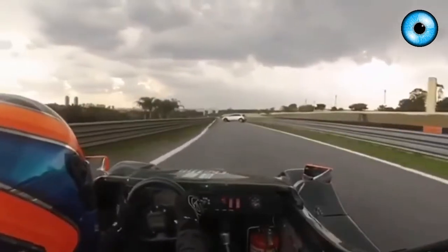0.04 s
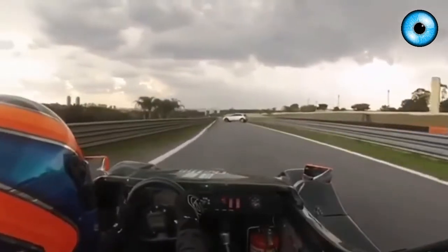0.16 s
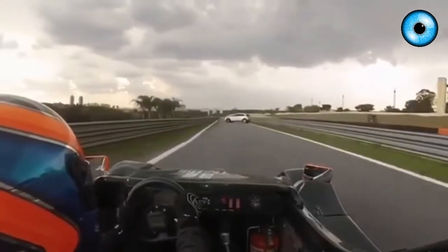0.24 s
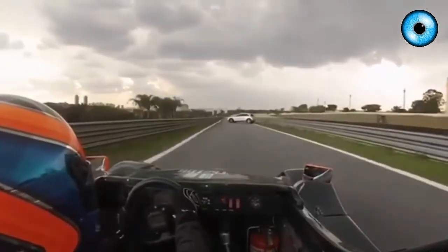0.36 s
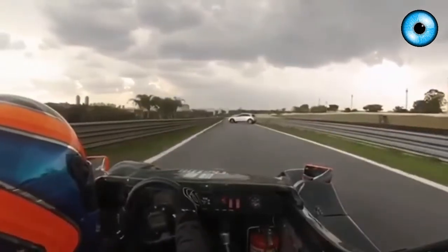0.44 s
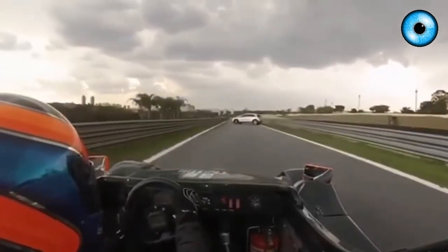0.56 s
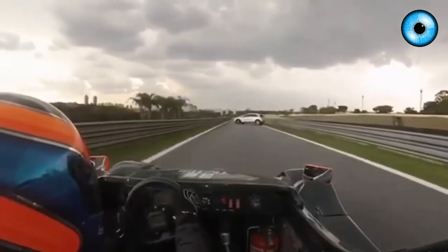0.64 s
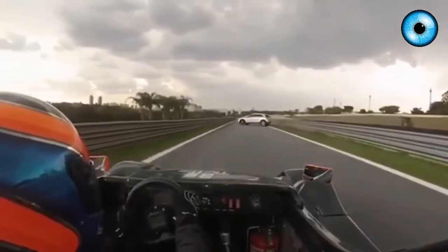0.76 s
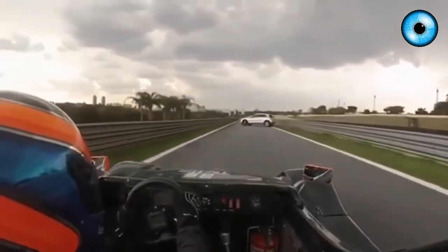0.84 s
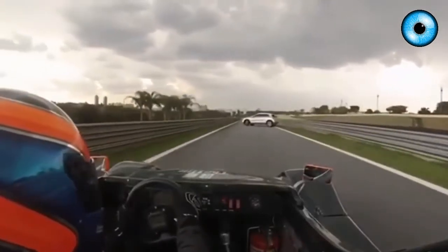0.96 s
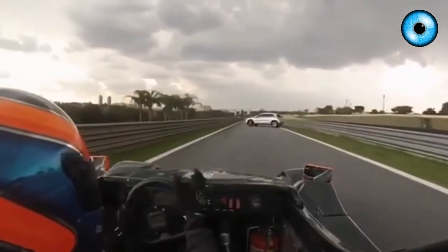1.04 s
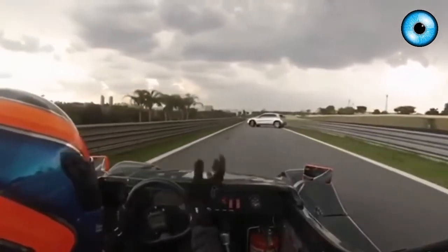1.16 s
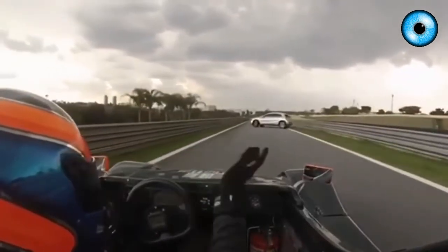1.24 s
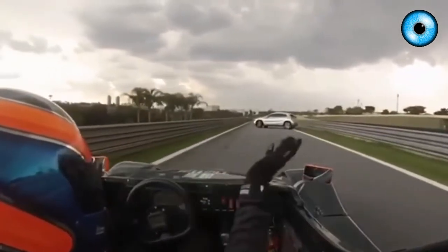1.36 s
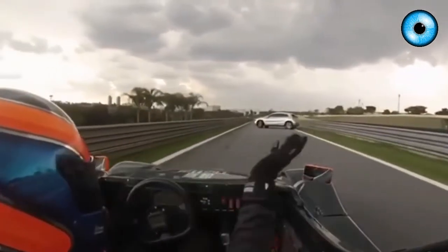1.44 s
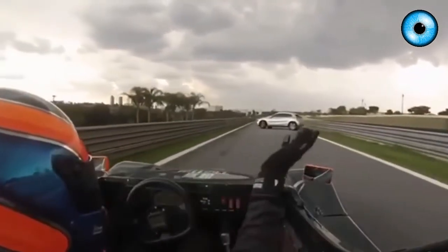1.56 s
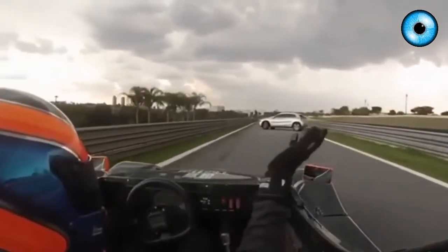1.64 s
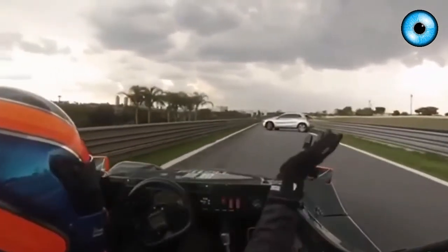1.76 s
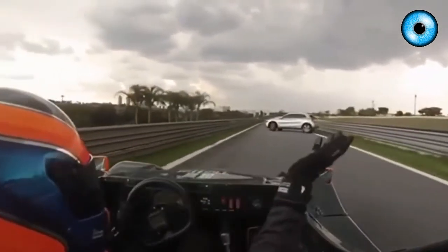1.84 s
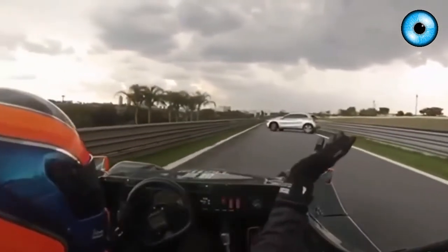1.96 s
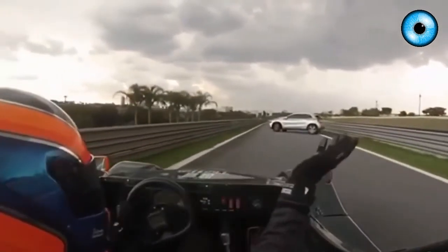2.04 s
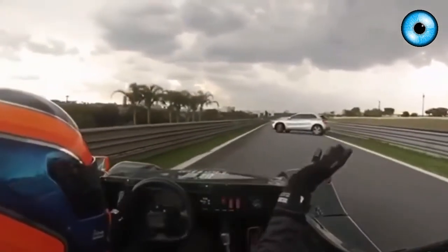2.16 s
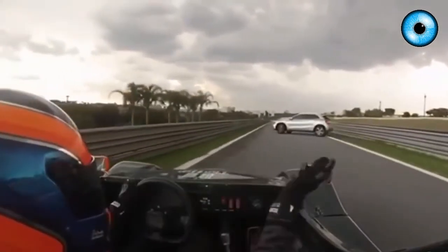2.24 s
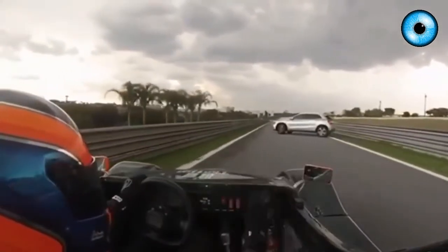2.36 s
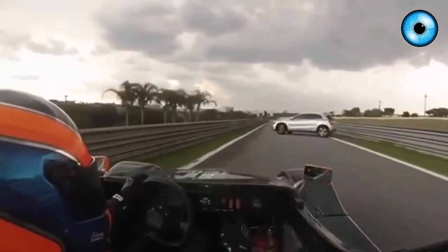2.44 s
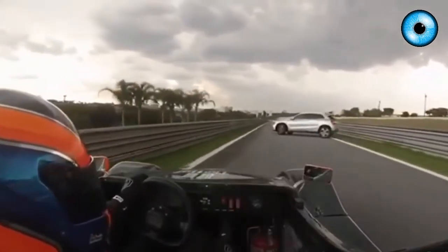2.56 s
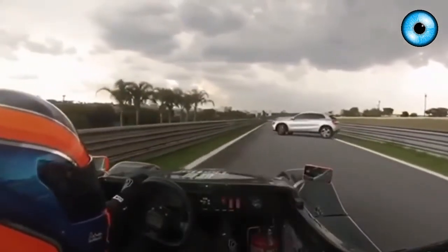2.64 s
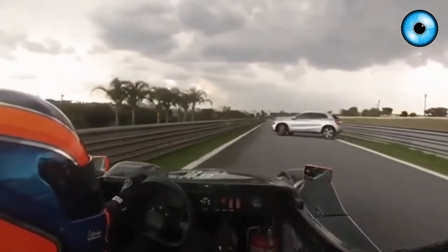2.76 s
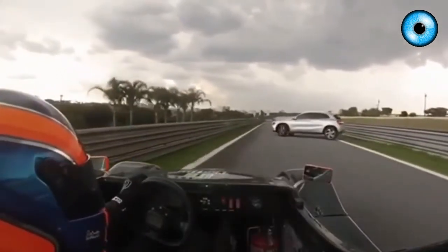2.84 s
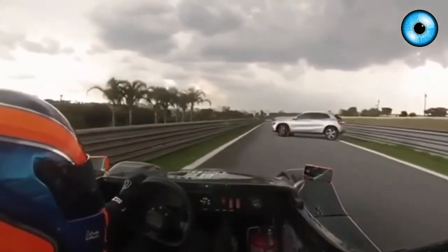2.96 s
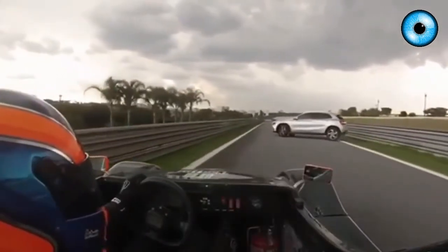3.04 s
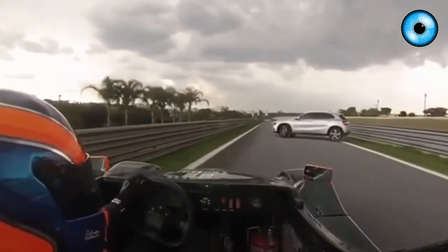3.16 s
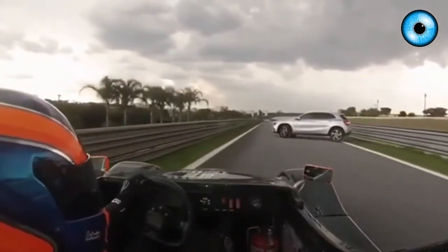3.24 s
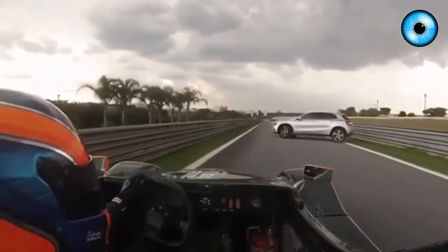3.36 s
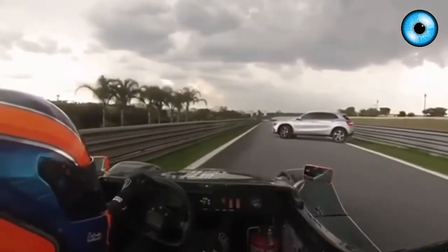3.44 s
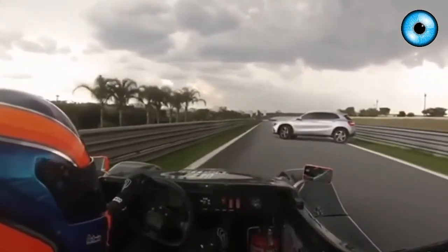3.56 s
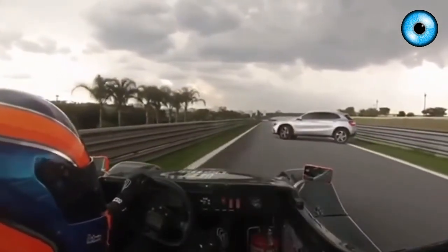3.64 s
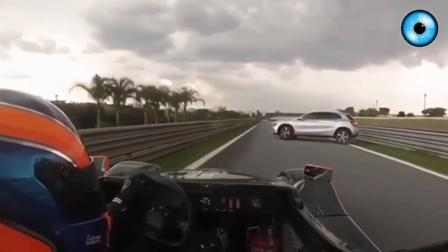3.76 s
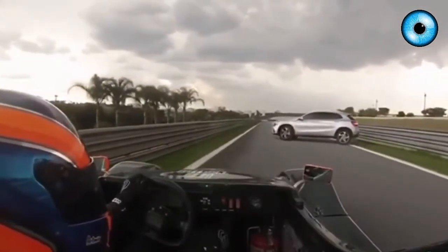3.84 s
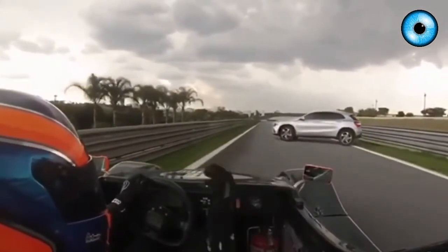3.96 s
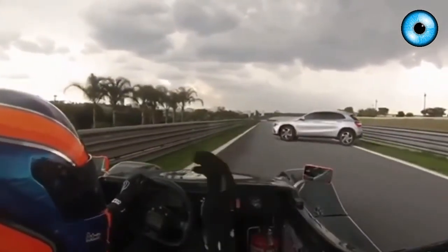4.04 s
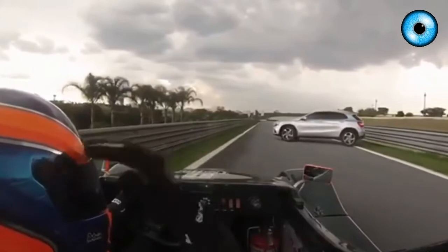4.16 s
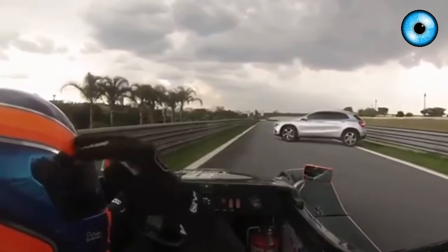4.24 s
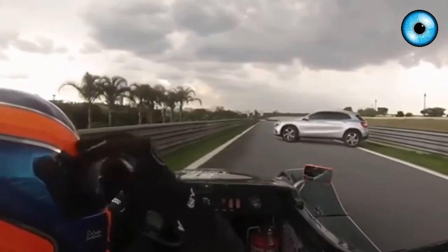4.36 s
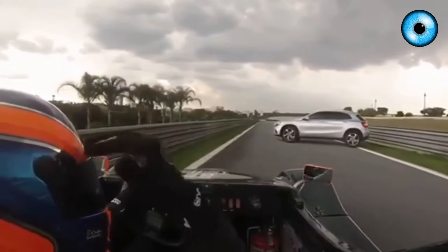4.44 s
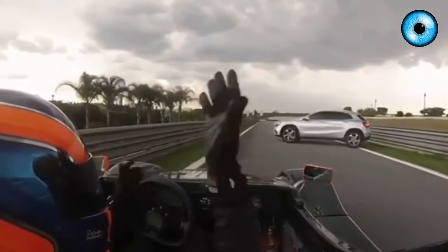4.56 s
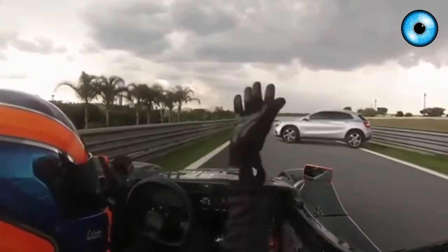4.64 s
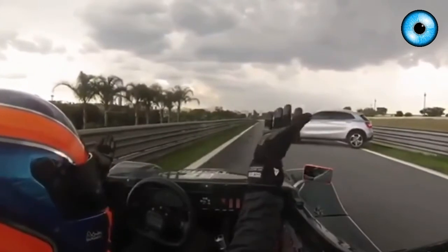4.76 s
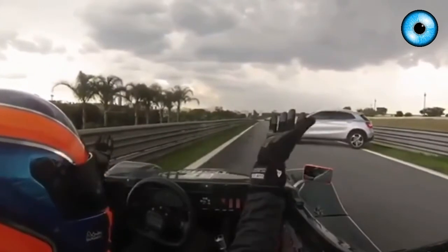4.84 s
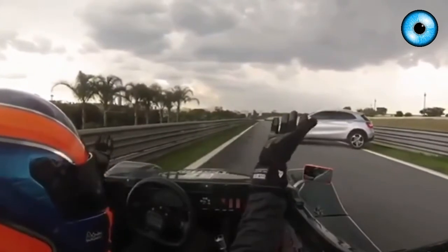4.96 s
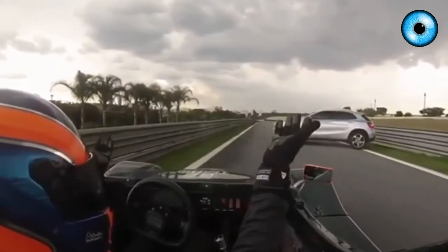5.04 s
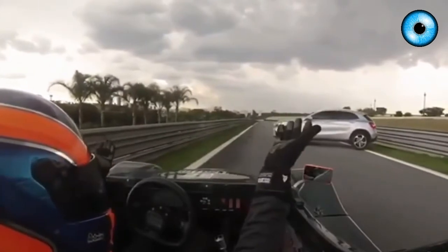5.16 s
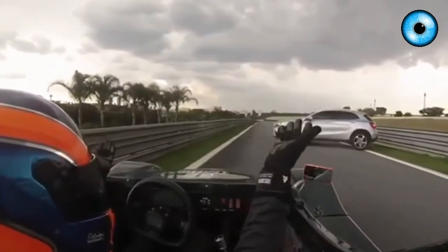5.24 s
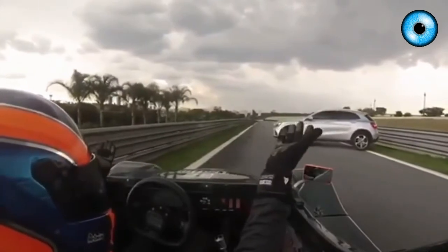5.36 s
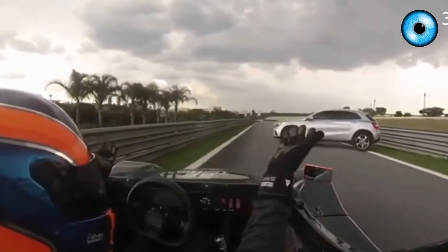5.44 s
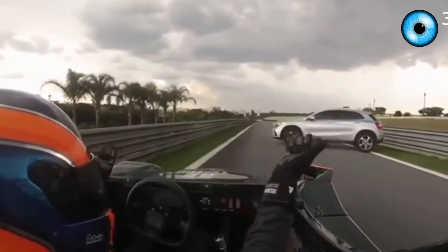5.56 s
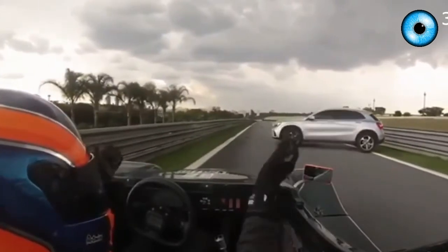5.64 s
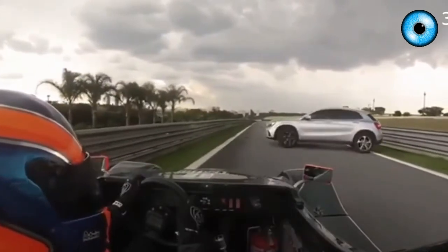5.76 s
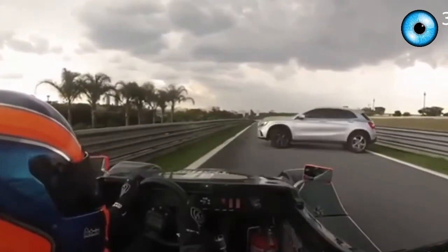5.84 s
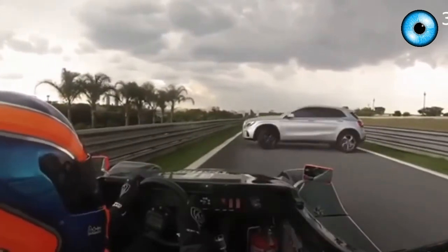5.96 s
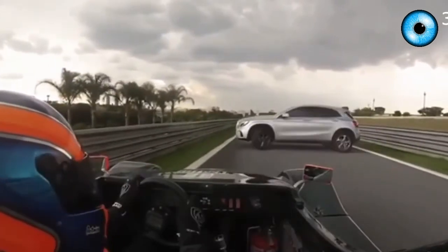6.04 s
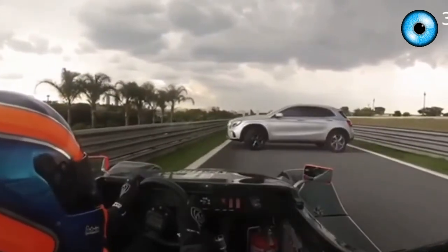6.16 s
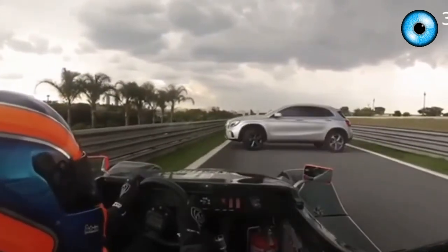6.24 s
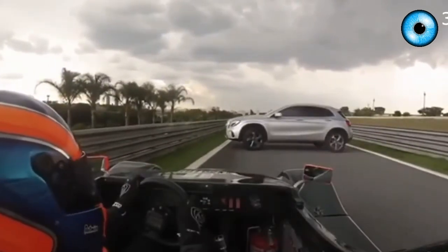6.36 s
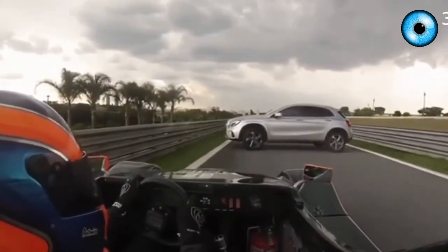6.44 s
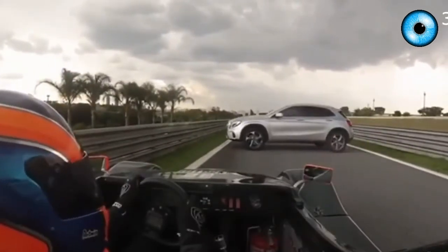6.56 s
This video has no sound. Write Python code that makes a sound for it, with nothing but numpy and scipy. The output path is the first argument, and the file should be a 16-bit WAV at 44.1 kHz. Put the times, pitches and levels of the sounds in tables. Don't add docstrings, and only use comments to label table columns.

```python
import sys
import numpy as np
from scipy import signal
from scipy.io import wavfile
from scipy.ndimage import uniform_filter1d

SR = 44100
rng = np.random.default_rng(int(sys.argv[2]) if len(sys.argv) > 2 else 0)


def bounce(signal):
    frames = np.transpose(np.atleast_2d(signal))
    limited = np.clip(frames, -1, 1)
    pcm = np.round(limited * 32767).astype(np.int16)
    wavfile.write(sys.argv[1], SR, pcm)


def level_to_linear(level):
    exponent = np.asarray(level, float) / 20
    return 10 ** exponent


N = 290619
TIME = np.arange(N) / SR

MOUNT_HZ, MOUNT_WIDTH_HZ = 51.5, 7.7
STOP_S, DECLUTCH_S = 3.8, .962

# [t/s, f/Hz]
FIRING_RATE = [(0.0, 90.5), (0.2, 86.7), (0.9, 62.1), (1.25, 44.8), (1.55, 31.0), (1.75, 33.6),
               (2.15, 37.8), (2.95, 37.8), (3.55, 36.5), (3.75, 34.3), (4.2, 37.3), (4.6, 35.6),
               (5.15, 37.3), (5.45, 36.2), (5.75, 37.0), (6.15, 33.0), (6.59, 33.3)]
# [multiple of the firing rate, level under the tone/dB, unsteadiness/dB]
OVERTONES = [(2, -13.5, 5), (4, -26, 5.5), (6, -15.5, 4.5), (8, -27, -0.5)]
# [f/Hz, width/Hz, level/dB]
TONE_LIFTS = [(48.35, 10.5, 21.5), (57.2, 4.8, 8.5), (40.9, 1.8, -11.5), (37.7, 7.2, 3.5)]
CYLINDERS_DB = [-0.3, -1.0, 1, 0.75]
# [place in the turn 0-1, length/turns, level/dB]
VALVE_CLACKS = [
    (0.63, 0.086, -8),
    (0.23, 0.088, -12),
]
# [t/s, length/s, clatter level/dB, panel level/dB, drone level/dB]
STUMBLES = [
    (1.3, 0.23, -5.5, -3, 1.5),
    (2.82, .05, -1, -8, 1.5),
    (3.037, 0.077, 3.5, -0.5, 1.5),
    (3.222, .07, 1, 2.5, -1),
    (3.603, 0.065, 3.5, 2.5, 8),
    (4.01, .04, 1, 5, -1),
    (4.47, 0.018, -2, 5, -2.5),
    (4.674, .1, 1, 2.5, -1),
    (5.717, .15, 0, -3.5, 1),
    (6.483, .03, -1, -2, 2),
]
# [t/s, length/s, level/dB]
BOOMS = [
    (.22, 0.23, 3.5),
    (0.385, 0.034, 5.5),
    (.83, 0.062, 6.5),
]
# [t/s, blow level/dB, low thud level/dB, bright tick level/dB]
BRACKET_KNOCKS = [(1.407, -21.5, -17, -20), (1.685, -15.5, -15, -21), (1.75, -20, -16, -17.5),
                  (2.246, -17, -19, -17), (2.771, -25, -13, -13.5), (3.056, -9.5, -0.5, -18),
                  (3.083, -17, 8, -16), (3.093, -19, 0.5, -19), (3.201, -17.5, -29, -20),
                  (3.406, -29, -4, -14), (3.601, -19.5, -3, -10), (3.612, -20, -15, -17),
                  (3.987, -26, -16, -6.5), (4.26, -31, -7, -6.5), (5.523, -21.5, 0.5, -13),
                  (5.579, -20.5, -8, -14), (6.022, -25, -19, -11.5), (6.15, -26, -19, -25),
                  (6.179, -25, -17, -37), (6.232, -19, -10, -29), (6.566, -23, 2.5, -15)]
CLIP_KNOCKS = [
    (1.835, -27, -9, -22),
    (2.988, -27, -18, -18),
    (3.069, -18, 3.5, -20),
    (3.192, -19.5, -22, -13),
    (3.341, -19, -18, -34.5),
    (3.402, -33.5, -13, -3.5),
    (3.558, -17, -13, -32),
]
# [t/s, level/dB]
SNAPS = [
    (3.064, -24),
    (3.611, -15.5),
]
# [t/s, length/s, level/dB]
BUMPS = [
    (.55, 0.37, 7.5),
    (1.559, 0.15, 9.5),
    (2.45, 0.11, 4),
    (3.252, .2, 6),
    (4.45, 0.2, 3.5),
    (5.2, .1, 4.5),
    (6.246, 0.38, 7.5),
]
# [f/Hz, idle level/dB, rolling level/dB]
CASE_COLOUR = [(90, -54, -54), (154, -64.5, -51), (261, -54.5, -44.5), (408, -60.5, -53.5), (625, -54, -47),
               (1140, -57.5, -48.5), (1597, -62.5, -44), (2246, -66, -50), (2943, -75.5, -60.5),
               (4560, -80.5, -64.5), (7060, -95, -76.5), (10600, -104, -89), (12700, -121, -102),
               (15500, -136, -112)]
# [f/Hz, width/Hz, idle level/dB, rolling level/dB]
CASE_MODES = [(220, 38, 4.5, 5), (297.7, 81, 14, 13), (374.7, 34, 8.5, 13.5), (507, 137.5, -23, -18),
              (704, 27, -16, -12), (1059.7, 68.5, 15, 14.5), (1148, 70, 6.5, 3), (1304, 60, 3.5, -8.5),
              (1385, 27, 2.5, 10), (1637, 50, 3.5, 9.5), (1737.5, 253, 16, 12), (2012, 193, -14, -14.5),
              (2311, 95, 6.5, 12), (2520, 185, 5.5, 11.5), (2640, 57, -19.5, 9.5), (2822, 167, 14, 10.5),
              (3194, 94, 11.5, 8.5), (3597, 310, 5.5, 7.5), (4119, 38, 12.5, 16), (4250, 200, -15.5, -7.5),
              (4710, 120, 5, 7), (5226, 106, 12.5, 9.5), (5650, 230, -5.5, -2), (6340, 110, 16.5, 10.5),
              (7850, 66, 3, 10), (8800, 220, 1, 3.5), (10780, 310, 11.5, 14.5)]
# [t/s, length/s, lower edge f/Hz, level/dB]
TREBLE_GAPS = [(.04, .08, 8300, -11), (.212, .014, 10200, -20), (1.94, .046, 3500, -23),
               (2.026, .014, 3600, -9), (2.222, .016, 3300, -10), (3.76, .014, 4000, -9),
               (4.41, .022, 3300, -10), (4.5, .014, 3600, -9), (5.565, .006, 3000, -7),
               (6.04, .018, 4000, -11), (6.42, .02, 4100, -11)]
# [f/Hz, share 0-1, level/dB]
PATCH_LOSS = [(7800, 0, -14), (8500, .35, -14), (10800, .45, -13), (11900, .5, -30), (13500, .5, -34),
              (14700, .3, -34), (15000, .7, -34)]


def firing(hz, turns, tone_db):
    idle = np.clip((46 - hz) / 6, 0, 1)
    throb_db = idle * (2.6 * np.cos(np.pi * turns / 2) + 1.7 * wander(20)) + .6 * wander(5.8)
    sing = level_to_linear(-24) * np.exp(-((hz - MOUNT_HZ) / MOUNT_WIDTH_HZ) ** 2) * np.cos(8 * np.pi * turns)
    upper = 0
    for multiple, db, sway_db in OVERTONES:
        upper = upper + level_to_linear(db + sway_db * wander(9)) * np.cos(2 * np.pi * multiple * turns)
    tone = level_to_linear(throb_db) * np.cos(2 * np.pi * turns)
    return np.sqrt(2) * level_to_linear(tone_db) * (tone - idle * upper + sing)


def idling(turns):
    level_db = by_speed(-40, rise_db=2.9, power=.88) + peaks(TIME, STUMBLES, column=0)
    panel_db = by_speed(-40.5, rise_db=5, power=2) + peaks(TIME, STUMBLES, column=1) + 1.6 * wander(14)
    drone_db = by_speed(-42, rise_db=19.6, power=1.72) + peaks(TIME, STUMBLES, column=2)
    drone_db = drone_db + 1.2 * wander(14)
    depth = np.clip(.68 + .08 * wander(8), 0, 1)
    cylinders_db = np.resize(CYLINDERS_DB, 1000)
    strength = level_to_linear(1.14 * rng.standard_normal((1000, 2)) + cylinders_db[:, None])
    noise = rng.standard_normal((3, N))

    beat = taps = 0
    for k, (place, length, db) in enumerate(VALVE_CLACKS):
        away = (turns - place + .5) % 1 - .5
        force = strength[(turns - place + 1.5).astype(int), k]
        beat = beat + level_to_linear(db) * force * np.exp(-.5 * (away / length) ** 2)
        tap = np.diff(np.floor(turns - place + length), prepend=0)
        taps = taps + np.sqrt(level_to_linear(db)) * force * tap
    taps = depth * evened(taps) / depth.mean()
    clatter = evened((1 - depth + depth * evened(beat)) * noise[0])

    cylinder_db = np.interp(turns + 1.0, np.arange(1000), cylinders_db)
    swell_db = cylinder_db + 4.1 * depth * np.cos(2 * np.pi * (turns - .85)) + .41 * wander(25)
    swell = level_to_linear(swell_db) * noise[1]
    sizzle_db = 1.18 * wander(28) + 1.5 * np.cos(np.pi * turns)
    sizzle = level_to_linear(sizzle_db) * (noise[2] + .22 * grit(320, 2.7) + .74 * clatter)
    air = level_to_linear(.77 * wander(15)) * rng.standard_normal(N)

    shake = band(evened(swell), 1370, "low")
    shake = shake + band(evened(clatter + .95 * taps), [1400, 2050], "band")
    shake = shake + band(.45 * taps, [900, 1400], "band")
    shake = shake + band(evened(sizzle), [2050, 4300], "band")
    shake = shake + band(air + .49 * sizzle, 4730, "high")
    sound = shell(shake * level_to_linear(.27 * wander(8.3)), column=0)

    drone = level_to_linear(drone_db + 1.5) * evened(band(sound, 470, "low"))
    panel = level_to_linear(panel_db) * evened(band(sound, [500, 1300], "band"))
    gear = level_to_linear(level_db - .16) * evened(band(sound, 1410, "high"))
    return (drone + panel + gear) * np.interp(TIME, [.95, 1.0, 2.0, 3.5], [0, .7, .8, 1])


def rolling(turns):
    free = step(DECLUTCH_S, .011)
    wheel_s, first_s, surge_s, fade_s = .126, .023, .061, 1
    surge_db = 4.5 * np.exp(-TIME / fade_s - (TIME - first_s) % wheel_s / surge_s)
    geared = (1 - free) * level_to_linear(-19 - 6.5 * TIME + uniform_filter1d(surge_db, size=300))
    coasting = free * level_to_linear(-31) * np.clip(1 - TIME / STOP_S, 0, 1)
    hiss_db = -44 - 9.5 * TIME - 7 * np.maximum(TIME - DECLUTCH_S, 0)
    gust_db = 7 * (step(.024, .02) - step(.312, .0073))

    pulse_db = wander(45.34) + .78 * np.cos(2 * np.pi * (turns - .9))
    shake = level_to_linear(pulse_db) * (rng.standard_normal(N) + .36 * grit(1500, .74))
    sound = shell(evened(shake), column=1)

    body = band(sound, 403, "low") * (geared * level_to_linear(peaks(TIME, BOOMS)) + coasting)
    panels = band(sound, [480, 1280], "band") * geared
    panels = panels + band(sound, [480, 930], "band") * coasting * level_to_linear(6.5)
    bite_db = 5.5 * step(DECLUTCH_S - .045, .008)
    gears = band(sound, [1280, 2050], "band") * (geared * level_to_linear(bite_db) + coasting)
    bright = band(sound, [2050, 3920], "band") * (geared * level_to_linear(1.5 - 2.5 * TIME) + coasting)
    hiss = evened(band(sound, 4180, "high")) * level_to_linear(hiss_db + gust_db + 2.5)
    return body + panels + gears + bright + hiss


def knocks():
    bracket_hz, clip_hz, fade_s, rise_s = 2820, 3480, .0078, .0011
    blows = np.zeros((4, N))
    rows = [(*row, bracket_hz) for row in BRACKET_KNOCKS] + [(*row, clip_hz) for row in CLIP_KNOCKS]
    noise, t = rng.standard_normal((len(rows), 2000)), np.arange(2000) / SR
    shape = np.exp(-t / fade_s) * (1 - np.exp(-t / rise_s)) ** 2
    for burst, (s, db, low_db, high_db, hz) in zip(noise, rows):
        ring = np.sin(2 * np.pi * hz * t) * (1 + .77 * evened(uniform_filter1d(burst, 40)))
        part = blows[:, round(s * SR):][:, :len(t)]
        gains = level_to_linear([[db + low_db + .5], [db], [db + high_db + 12.5], [db + high_db]])
        part += (gains * [burst, burst, burst, ring] * shape)[:, :part.shape[1]]

    thud, blow, tick, ringing = blows
    shake = band(thud, 500, "low") + band(blow, [1250, 2100], "band")
    shake = shake + .51 * band(blow, [500, 1250], "band") + band(tick, [2100, 4100], "band")
    snaps = sum(level_to_linear(db) * np.exp(-((TIME - s - fade_s) / fade_s) ** 2) for s, db in SNAPS)
    shake = shake + band(snaps * rng.standard_normal(N), [4000, 8500], "band")
    return level_to_linear(-4.5) * shell(shake, column=0) + band(ringing, 5300, "low")


def mount(hz):
    noise = rng.standard_normal((2, N))
    r, w = np.exp(-np.pi * MOUNT_WIDTH_HZ / SR), 2 * np.pi * MOUNT_HZ / SR
    swing = signal.lfilter([1, 0, -1], [1, -2 * r * np.cos(w), r * r], noise[0])
    note = evened(band(swing, 81, "low"))
    note = evened(note / (uniform_filter1d(note ** 2, 1700) + .1) ** .3)
    rumble = evened(band(band(noise[1], 167, "low"), 28, "high"))

    jolt_s, jolt_db, jolt_hz, length_s = 1.853, -16, 50, .021
    since = TIME - jolt_s
    jolt = -level_to_linear(jolt_db) * np.sin(2 * np.pi * jolt_hz * since) * np.exp(-(since / length_s) ** 2)

    lock_db = peaks(hz, [(52, 14, -10)])
    swing_db = by_speed(-46, rise_db=19.5, power=1.05) + peaks(TIME, BUMPS) + lock_db
    return jolt + level_to_linear(swing_db) * note + level_to_linear(by_speed(-51.5, rise_db=17.5, power=.8)) * rumble


def shell(x, column):
    hz = np.abs(np.fft.fftfreq(16384, 1 / SR))
    table = np.transpose(CASE_COLOUR)
    db = np.interp(np.log(hz + 1), np.log(table[0]), table[1 + column])
    db = db + peaks(hz, CASE_MODES, column)
    log_gain = np.log(level_to_linear(db))
    taps = np.fft.ifft(np.exp(log_gain - 1j * signal.hilbert(log_gain).imag)).real[:8192]
    felt = (hz > 900) & (hz < 3000)
    return signal.oaconvolve(x, taps)[:N] / np.sqrt(np.sum(level_to_linear(db[felt]) ** 2) / len(hz))


def grit(per_s, spread_db):
    struck = rng.random(N) < per_s / SR
    ticks = struck * rng.standard_normal(N)
    return evened(ticks * level_to_linear(spread_db * np.minimum(rng.exponential(1, N), 4)))


def wander(hz):
    knots = rng.standard_normal(2000)
    drift = np.interp(TIME * hz, np.arange(len(knots)), knots)
    return evened(uniform_filter1d(drift, int(SR / hz / 2)))


def by_speed(rest_db, rise_db, power):
    return rest_db + rise_db * np.clip(1 - TIME / STOP_S, 0, 1) ** power


def peaks(x, rows, column=0):
    return sum(row[2 + column] / (1 + (2 * (x - row[0]) / row[1]) ** 2) for row in rows)


def step(s, length):
    return .5 + .5 * np.tanh((TIME - s) / length)


def band(x, hz, kind):
    return signal.sosfilt(signal.butter(4, hz, kind, fs=SR, output="sos"), x)


def evened(x):
    return x / np.sqrt(np.mean(x ** 2) + 1e-20)


def scene():
    s, rate_hz = np.transpose(FIRING_RATE)
    hz = np.interp(TIME, s, rate_hz)
    tone_db = -14.5 + .4545 * (hz - hz[0]) - .5 * TIME + peaks(hz, TONE_LIFTS)
    turns = np.cumsum(hz * (1 + .0088 * wander(13))) / SR
    return (firing(hz, turns, tone_db) + mount(hz) + rolling(turns) + idling(turns) + knocks())[None]


def low_pass(x):
    return signal.sosfilt(signal.butter(12, 15140, fs=SR, output="sos"), x)


def record(dry):
    x = dry + level_to_linear(-100) * rng.standard_normal(dry.shape)
    hz, t, z = signal.stft(x, SR, nperseg=512)
    power = uniform_filter1d(abs(z) ** 2, size=5, axis=2)
    around = uniform_filter1d(power, size=15, axis=1)
    weak = power < level_to_linear(11) * around
    hollow = (power < .45 * around) & (hz > 1200)[:, None]
    for s, length, edge_hz, db in TREBLE_GAPS:
        above = 1 / (1 + (edge_hz / (hz[:, None] + 1)) ** 12)
        depth_db = (weak * above + hollow * (1 - above) / 2) * db
        z = z * level_to_linear(depth_db * np.exp(-(2 * (t - s) / length) ** 4))

    luck = rng.random((200, 40))[(t / .046).astype(int)][:, (hz / 600).astype(int)].T
    at_hz, share, loss_db = np.transpose(PATCH_LOSS)
    loud = np.interp(t, [1.05, 1.3], [1, .1])
    lost = luck < np.interp(hz, at_hz, share)[:, None] * loud
    z = z * level_to_linear(lost * np.interp(hz, at_hz, loss_db)[:, None])
    z = z * level_to_linear(-8 * (hollow & (1 - luck < .3) & (hz > 3800)[:, None]))
    mix = signal.istft(z, SR, nperseg=512)[1][:, :N]
    return low_pass(mix)


dry = scene()
out = record(dry)
bounce(out)
```